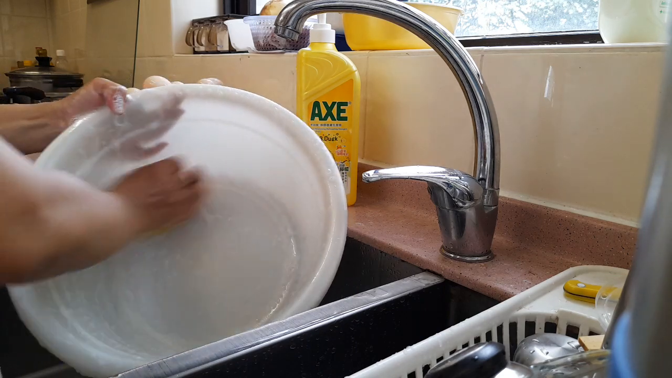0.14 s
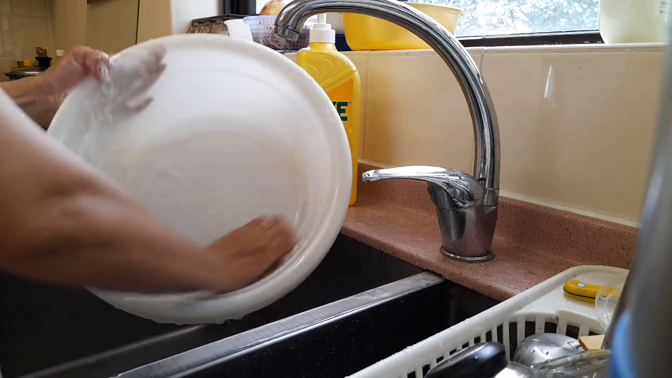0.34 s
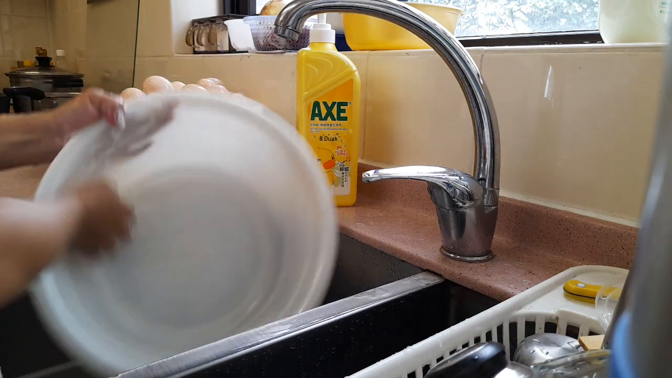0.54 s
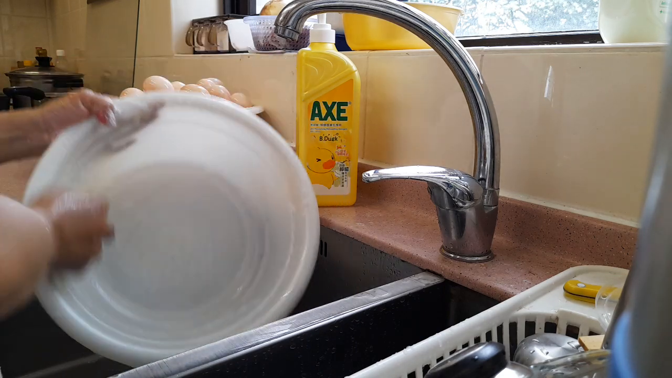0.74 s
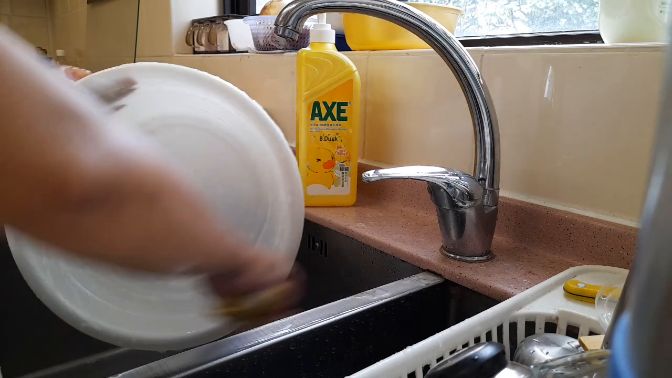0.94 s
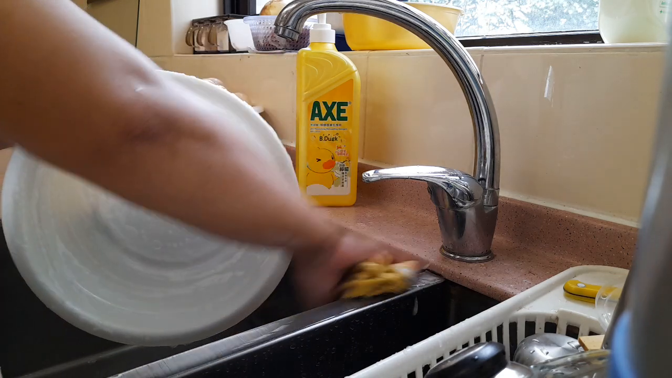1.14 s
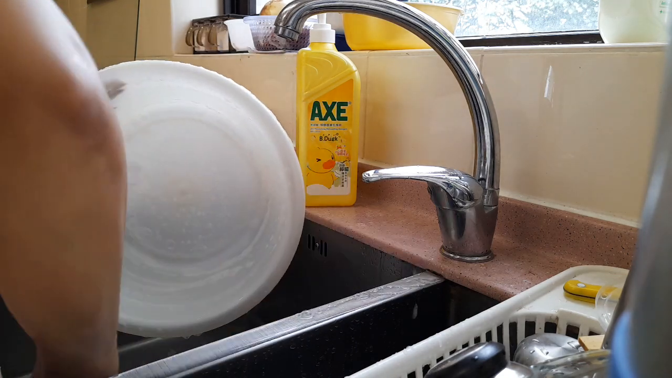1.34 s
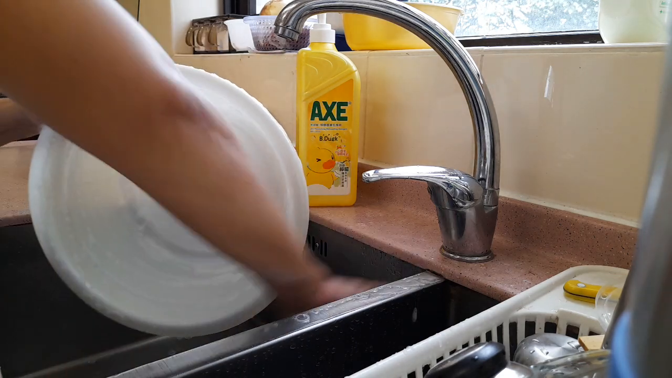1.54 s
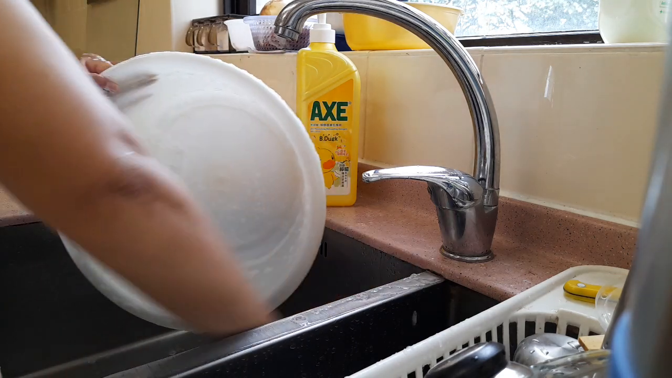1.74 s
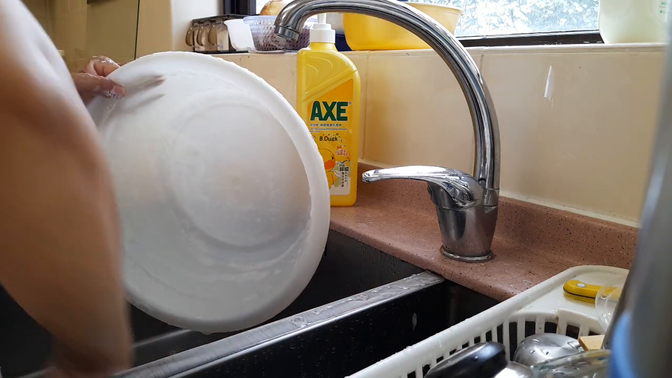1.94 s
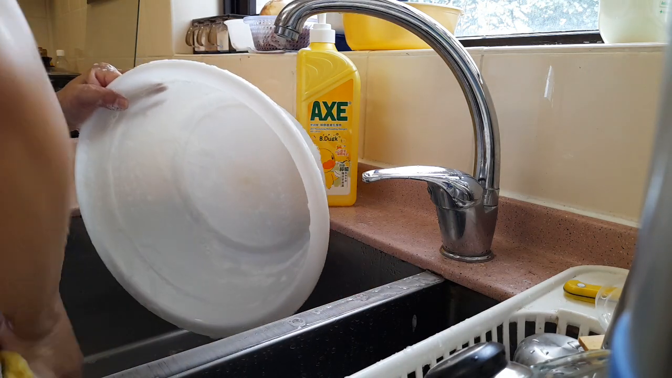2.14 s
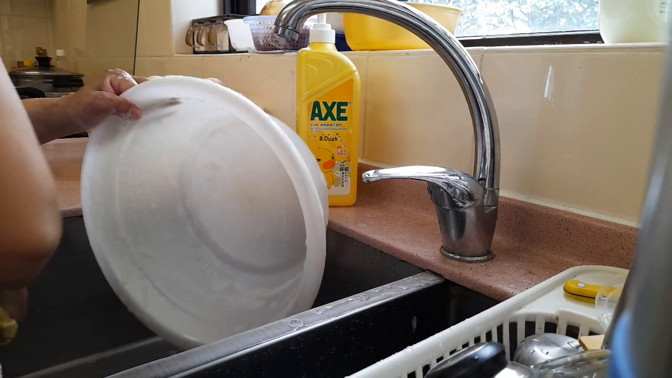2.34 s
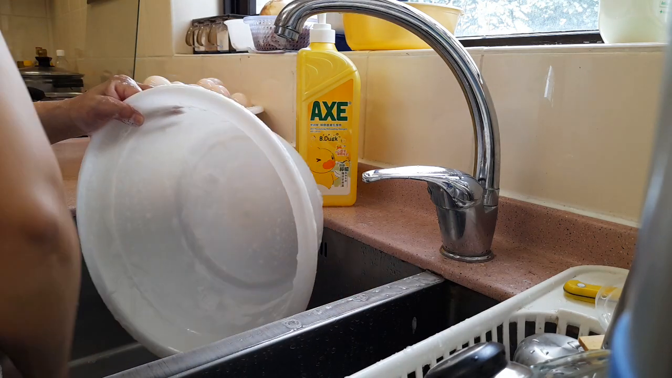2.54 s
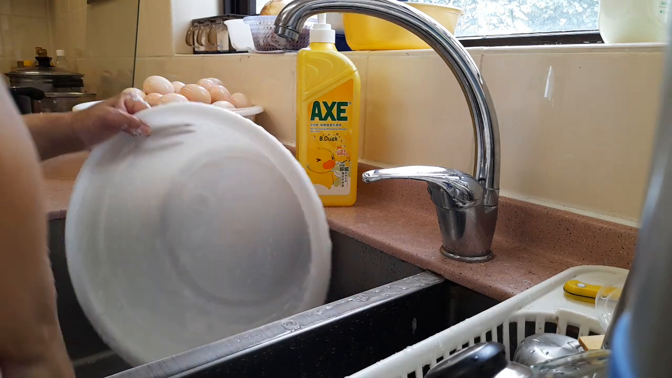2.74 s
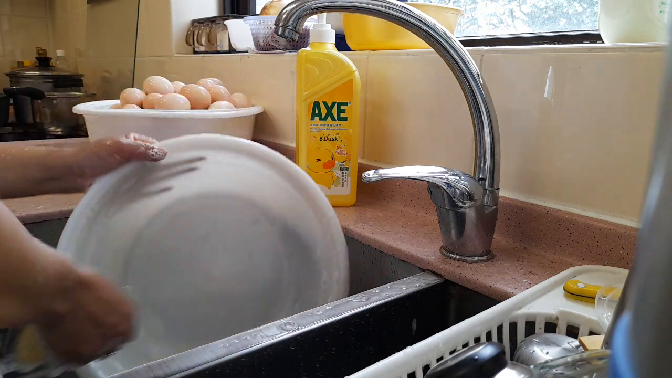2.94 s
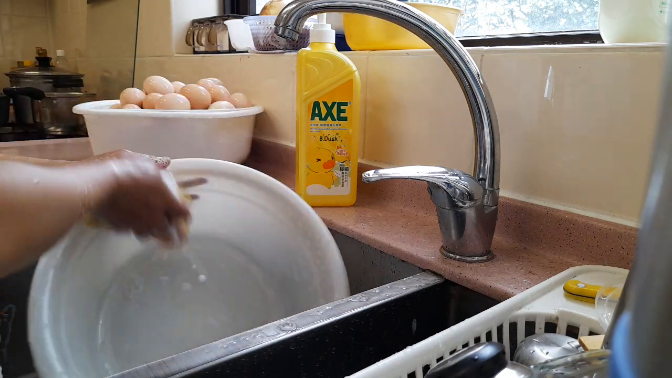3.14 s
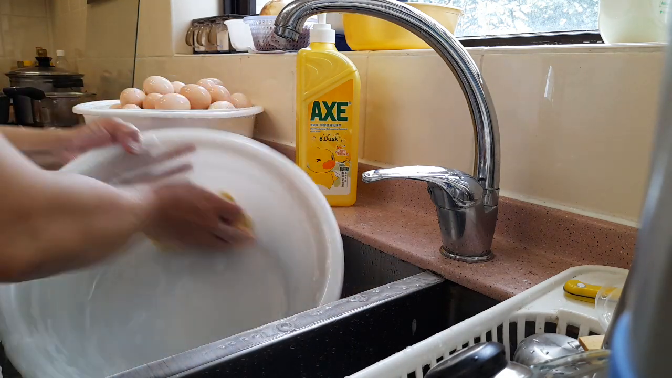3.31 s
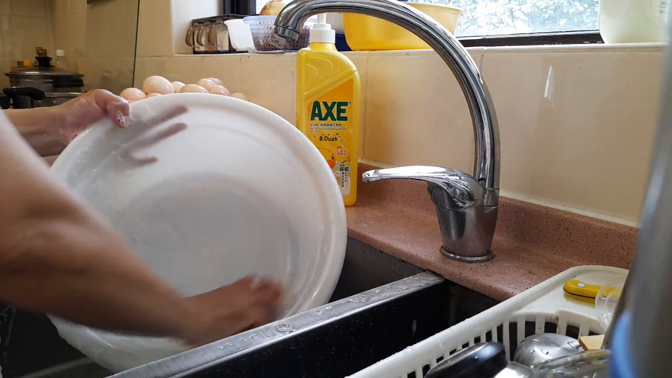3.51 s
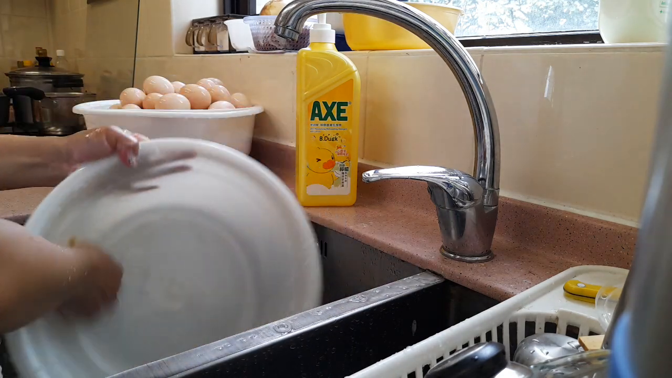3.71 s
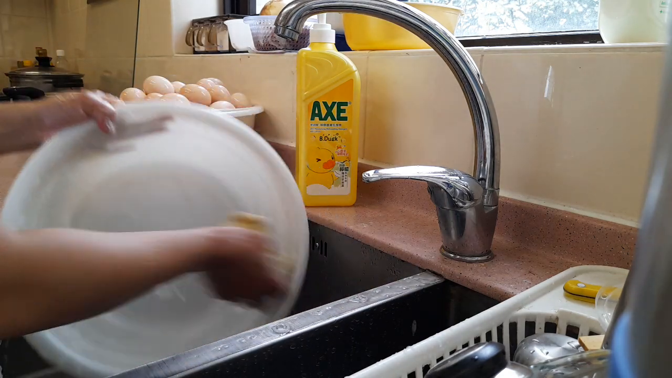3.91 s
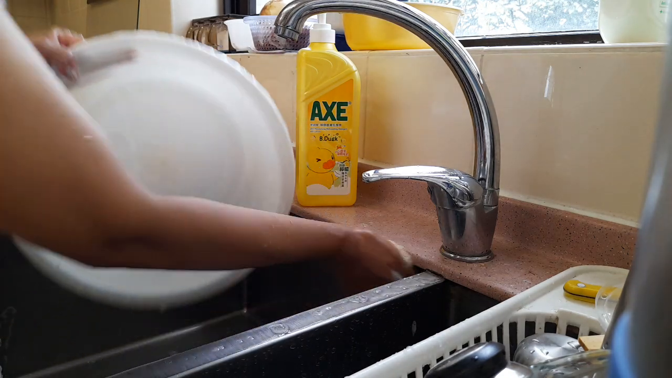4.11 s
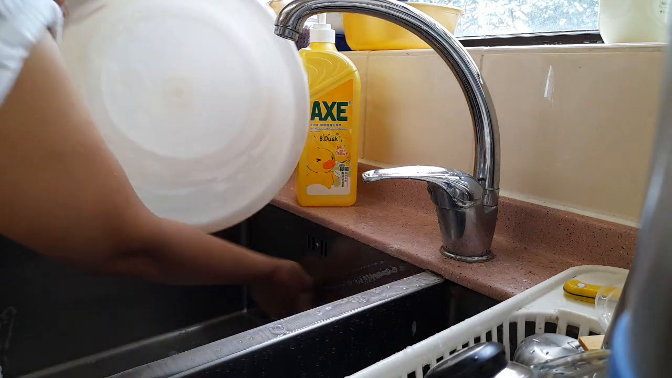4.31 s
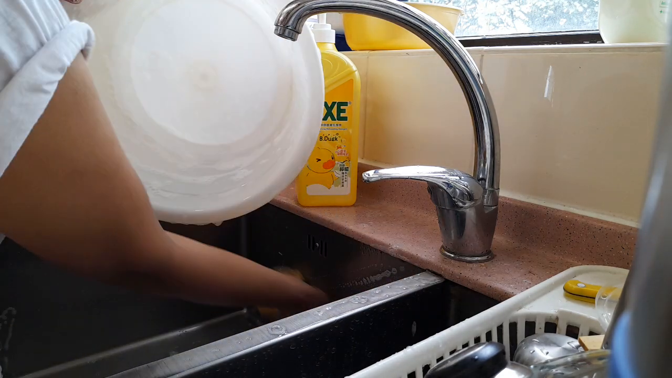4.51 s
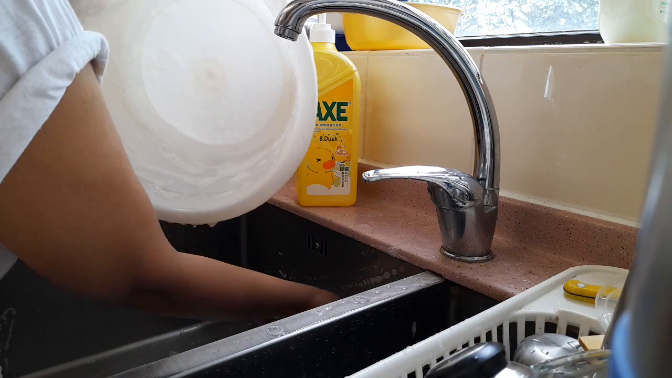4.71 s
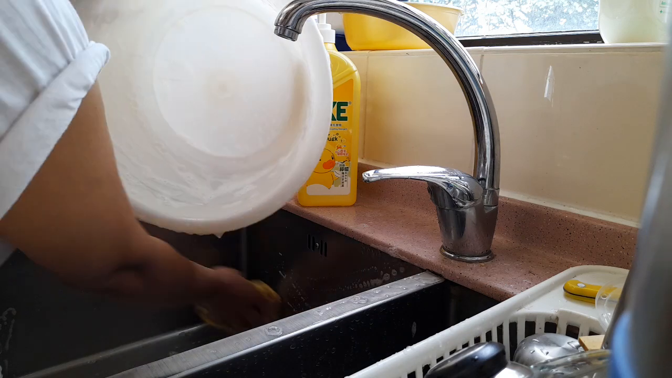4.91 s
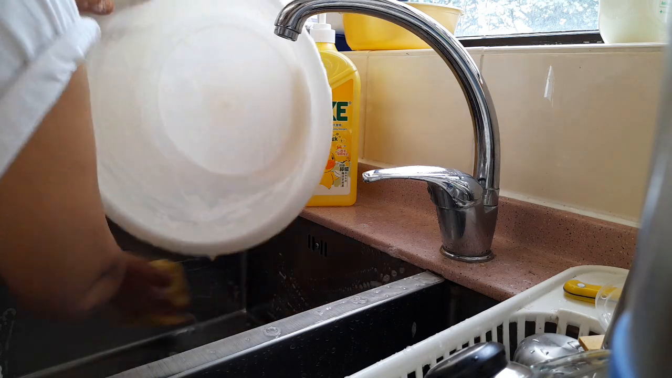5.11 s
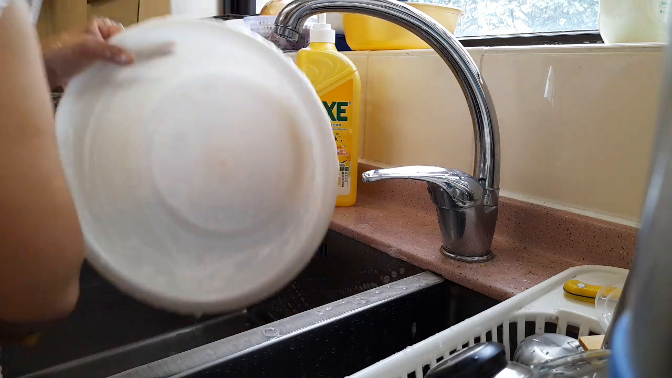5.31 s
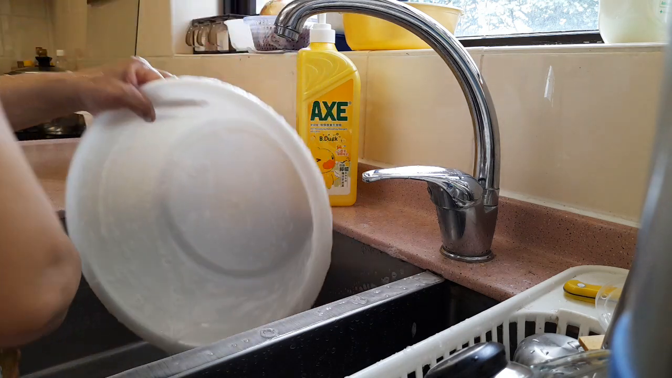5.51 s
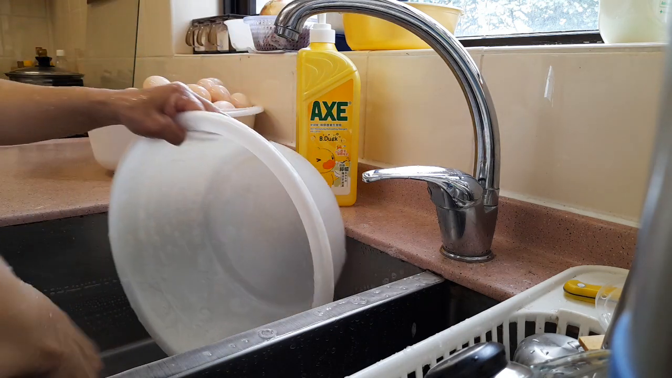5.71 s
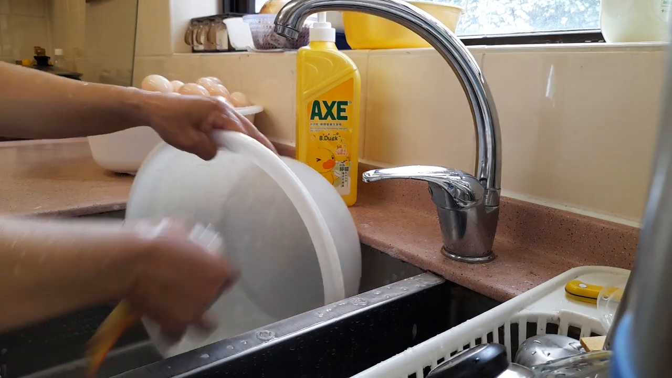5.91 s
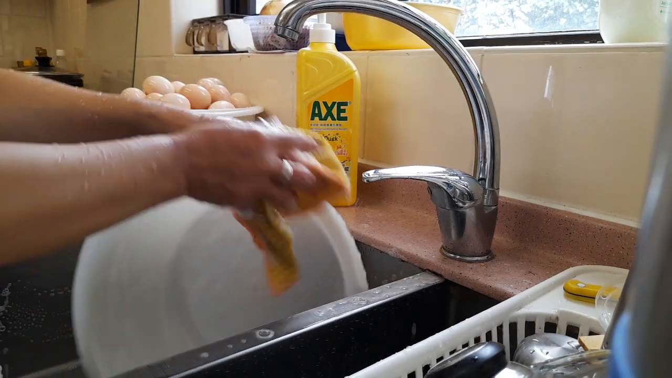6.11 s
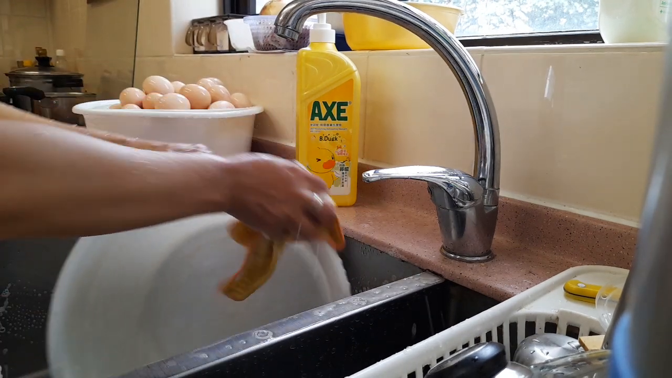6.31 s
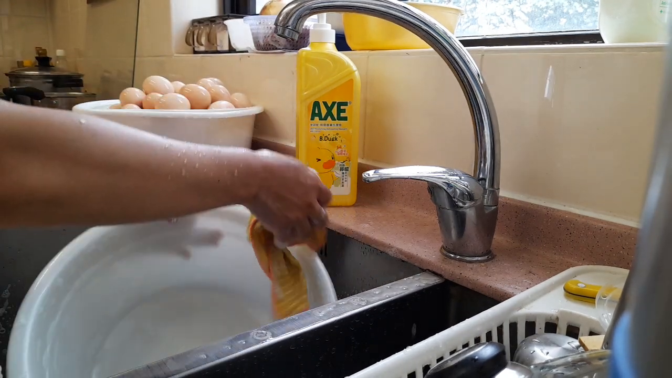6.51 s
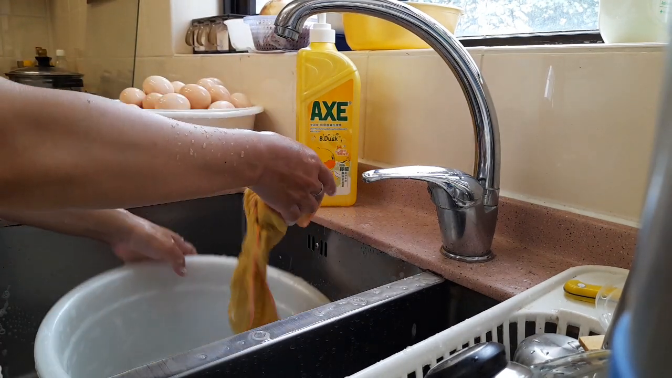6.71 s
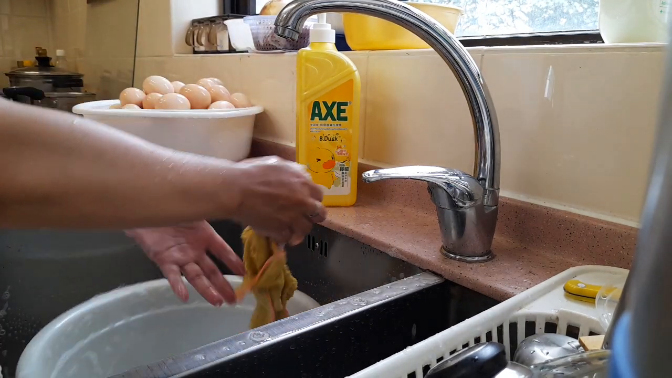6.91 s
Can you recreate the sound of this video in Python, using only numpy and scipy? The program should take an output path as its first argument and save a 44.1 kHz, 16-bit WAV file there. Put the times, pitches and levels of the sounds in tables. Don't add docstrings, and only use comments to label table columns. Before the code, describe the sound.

A wet sponge wipes a large plastic basin in a steel sink, heard close in a small tiled kitchen. Faint scuffs and a few dull booms come first, then a loud hollow knock, a quieter stretch of slaps and suds crackle, and finally a rapid cluster of hard thumps and rim clacks. Low outdoor rumble, fan murmur and a very faint high whine lie underneath.

```python
import sys
import numpy as np
from scipy import signal
from scipy.fft import rfft, irfft, next_fast_len
from scipy.io import wavfile
from scipy.ndimage import uniform_filter1d, map_coordinates

SR = 44100
rng = np.random.default_rng(int(sys.argv[2]) if len(sys.argv) > 2 else 0)


def wav_record(signal):
    frames = np.transpose(np.atleast_2d(signal))
    bounded = np.clip(frames, -1, 1)
    quanta = np.round(bounded * 32767).astype(np.int16)
    wavfile.write(sys.argv[1], SR, quanta)


def decibels_to_gain(level_db):
    exponent = np.asarray(level_db, float) / 20
    return 10 ** exponent


N = 306495
PAD, FRAME = 8192, 512

# time in [s], level in [dB].
RUMBLE_LEVEL = [
    (0.0, -54.5),
    (3.1, -52.5),
    (3.46, -45.5),
    (3.66, -51),
    (4.5, -52),
    (4.74, -52),
    (5.36, -52.5),
    (5.73, -50.5),
    (6.19, -53.5),
    (6.95, -45),
]
# frequency in [Hz], density in [dB per Hz].
RUMBLE_COLOUR = [(15, -48), (25, -28), (39, -8.5), (59, 4.5), (80, -6.5), (188, -4), (222, -6.5),
                 (259, -26), (295, -12), (387, -17.5), (420, -25), (550, -61), (920, -120)]
FAN_COLOUR = [(180, -13.5), (300, 1), (388, -6.5), (413, -11), (528, -2), (579, -7), (690, -2.5),
              (1040, -4.5), (1200, -12), (1500, -15.5), (2200, -28), (3500, -47), (4550, -58), (7700, -120)]
HISS_COLOUR = [(1200, -23), (2000, 4.5), (2460, -26), (5160, -12), (8550, -18), (9660, -29), (12700, -8),
               (13700, -3), (14300, -14), (14700, -34), (15200, -49), (16000, -60)]
SPONGE_COLOUR = [(300, -47), (600, 1), (1200, 4.5), (1830, -2), (3050, -6.5), (6800, -15.5), (8630, -15.5),
                 (9820, -10), (12700, -17.5), (14500, -14), (15600, -48), (16300, -70), (17000, -90)]
FAN_DB, FAN_FOLLOWS = -48.5, 0.53

# frequency in [Hz], level in [dB rms].
WHINE_TONE = [(13297, -68.5)]
# time in [s], gain in [dB].
WHINE_GAIN = [
    (0, -3),
    (3, -4.5),
    (4, -1.5),
    (6.95, -0.5),
]

# time in [s], hiss in [dB].
STROKE_LEVEL = [(0.0, -58.5), (0.29, -56), (0.41, -58.5), (1.08, -60.5), (1.59, -57.5), (1.74, -59.5),
                (2.9, -59.5), (3.31, -55.5), (3.39, -46.5), (3.6, -55), (4.04, -61), (4.18, -57),
                (4.63, -61.5), (6.08, -55), (6.21, -49), (6.58, -60.5), (6.7, -50.5), (6.95, -58)]
# strongest moment in [s], rumble in [dB], time to fade 10 dB either side in [s].
RIM_DRAGS = [(0.29, -38, 0.5), (1.17, -37, 0.5), (2.2, -40.5, 1.3), (3.39, -24, 0.07), (3.56, -41, -37),
             (4.15, -40, 1.5), (5.2, -38.5, 0.5), (5.71, -42, 0.9), (6.21, -35, 0.9), (6.58, -18.5, 0.05),
             (6.72, -30.5, 0.5), (6.95, -17, 0)]
RESTING_DB = -47

# frequency in [Hz], level in [dB], t60 in [s].
SINK_MODES = [(113, 12.5, 0.31), (139.6, 15, 1), (178, 18, 1), (181, 4, 1), (216, 5, 0.13),
              (285, -1.5, 0.65), (326, -7, 0.71), (364, 0, 0.058), (462, -4, 0.62), (539, -7.5, 0.11),
              (620, -24, 0.059), (670, -3.5, 0.46)]
# start in [s], steel boom in [dB], basin boom in [dB], basin pitch in [Hz].
SINK_BLOWS = [(0.181, -51, -58, 176), (1.316, -35, -23.5, 178), (1.417, -40, -24, 179),
              (1.645, -28, -21, 197.6), (1.7, -43, -50, 205), (1.749, -40, -30.5, 170),
              (2.062, -50, -31.5, 196), (2.409, -52, -33.5, 192), (3.313, -14.5, -12, 195),
              (3.363, -22.5, -60, 200), (3.992, -35, -57, 200), (4.109, -20, -55, 210),
              (5.02, -32, -46, 188), (5.565, -35.5, -38, 200), (5.717, -34, -31, 188),
              (6.144, -17.5, -26, 200), (6.191, -19.5, -46, 204), (6.208, -50, -50, 200),
              (6.226, -29, -17, 202), (6.264, -17.5, -34, 197), (6.299, -26.5, -35, 195),
              (6.33, -50, -47, 200), (6.512, -13.5, -12, 200), (6.559, -5, -5.5, 181),
              (6.621, -42, -40, 190), (6.643, -31, -16.5, 188), (6.669, -42, -32, 180),
              (6.787, -24, -52, 200), (6.858, -16, -17.5, 185), (6.909, -35, -17, 206)]
# time in [s], t60 in [s].
STEEL_DECAY = [
    (3.33, 0.58),
    (3.36, 0.85),
    (3.9, 0.39),
    (4.1, 0.48),
    (4.5, 0.26),
    (6.52, 0.34),
    (6.55, 0.24),
    (6.63, 0.32),
]
# start in [s], low tone in [dB], [Hz], high tone in [dB], [Hz].
WALL_TONES = [(0.169, -53, 362, -38, 449), (1.315, -23.5, 333.4, -28, 549), (1.654, -29, 288, -49, 500),
              (1.682, -32, 284, -64, 490), (2.4, -48, 312, -38, 670), (3.312, -27, 335.5, -31.5, 652),
              (3.364, -33, 269, -30.5, 489), (4.11, -52, 272, -73, 560), (5.72, -26.5, 248.5, -30, 559),
              (6.14, -36, 267, -32, 678), (6.189, -42, 280, -32.5, 672), (6.21, -33, 377, -40, 670),
              (6.264, -32.5, 369, -51, 420), (6.516, -40, 400, -24, 670), (6.558, -23, 340, -33, 497),
              (6.578, -22.5, 285, -37, 543), (6.64, -47, 258, -38, 496), (6.786, -40, 280, -40, 670),
              (6.859, -28.5, 482, -25.5, 670), (6.89, -33, 315, -31, 620), (6.912, -30, 475, -32, 624)]
# start in [s], peak in [dB], frequency in [Hz].
BOWL_AIR = [(1.316, -22, 112.4), (1.739, -35, 109), (1.875, -37, 120), (3.313, -22, 107), (3.364, -27, 140),
            (3.498, -29, 122), (4.109, -40.5, 118.6), (5.723, -30, 111), (6.13, -34, 107),
            (6.223, -28, 132), (6.265, -31, 108), (6.298, -25, 136), (6.384, -28, 132.4),
            (6.512, -17.5, 119.3), (6.556, -23, 113), (6.641, -23, 115), (6.859, -25, 123),
            (6.907, -24, 155)]
# start in [s], peak in [dB], frequency in [Hz].
COUNTER_SHAKES = [(1.055, -43, 66), (1.36, -39, 58), (1.744, -38, 83), (3.313, -20, 79.3),
                  (3.369, -21, 77.5), (4.718, -36, 55), (6.145, -23.5, 76), (6.227, -25.5, 88.6),
                  (6.265, -21.5, 91.6), (6.382, -38, 89), (6.511, -20, 89), (6.557, -38, 89)]
# start in [s], peak in [dB], frequency in [Hz].
BASIN_PUSHES = [
    (1.3143, -19, 332),
    (1.317, -25, 225),
    (1.6445, -39, 253),
    (3.3139, -19, 180),
    (5.7224, -20, 252),
    (6.1408, -21.5, 238),
    (6.5142, -20, 200),
    (6.86, -24, 200),
    (6.868, -21, 160),
]
STEEL_HZ = 215.9
BASIN_T60, WALL_T60, BOWL_T60, COUNTER_T60, PUSH_T60 = 0.12, 0.17, 0.24, 0.31, 0.022
CHOKE_T60 = 0.067

# start in [s], peak in [dB], frequency in [Hz].
BUBBLES = [(0.1765, -48, 14300), (0.1768, -48, 10600), (0.3044, -45, 9950), (0.3461, -45, 11800),
           (0.411, -46, 12100), (1.064, -54, 9550), (1.119, -51, 9600), (1.4077, -47, 11500),
           (2.5566, -50, 12500), (2.564, -54, 14500), (3.2435, -44, 14300), (3.2437, -46, 10500),
           (3.473, -45, 11400), (3.497, -45, 9420), (3.508, -46, 9300), (3.5085, -48, 12200),
           (4.5935, -56, 9900), (4.66, -54, 10500), (5.015, -52, 11200), (5.0152, -50, 14300),
           (5.0357, -31, 10200), (5.3383, -42, 10300)]
SUDS_WIDTH, SUDS_T60 = 0.13, 0.022

# frequency in [Hz], width in [Hz], level in [dB].
SHELL_MODES = [(800, 510, -5), (1043, 57, 5), (970, 170, 20), (1190, 67, -12), (1430, 130, 11),
               (1630, 140, 9.5), (1710, 130, 14), (1950, 55, -25), (2410, 61, 7), (2750, 550, 4)]
# start in [s], scuff in [dB], shell knock in [dB], fizz in [dB], t60 in [s].
RIM_KNOCKS = [(0.1767, -47, -45, -50.5, 0.34), (0.3042, -43, -43, -48, 0.08),
              (0.3464, -52, -44.5, -51, 0.2), (0.4144, -58, -52, -54, 0.063), (1.3153, -45, -34, -52, 0.04),
              (3.3112, -26, -26, -31.5, 0.13), (3.3695, -34.5, -37.5, -47, 0.12),
              (3.5024, -39.5, -42.5, -46, 0.12), (4.1103, -41.5, -41.5, -51, 0.12),
              (5.7184, -48, -44, -62, 0.09), (6.1392, -28.5, -29, -42, 0.074),
              (6.1911, -28.5, -28, -37.5, 0.045), (6.198, -32.5, -34, -46, 0.056),
              (6.2365, -43, -37, -59, 0.15), (6.2737, -34, -33.5, -51, 0.067),
              (6.5111, -22.5, -22.5, -29, 0.06), (6.53, -36, -33, -40, 0.043),
              (6.559, -30, -29.5, -49, 0.04), (6.568, -41, -34, -53, 0.045),
              (6.639, -37.5, -35.5, -48, 0.043), (6.7824, -40, -40, -54, 0.047),
              (6.8568, -24.5, -26.5, -31, 0.051), (6.878, -41, -40, -51, 0.061),
              (6.905, -52, -44, -55, 0.068)]
# start in [s], scuff in [dB], shell knock in [dB], fizz in [dB].
SPONGE_SLAPS = [(0.2131, -46, -52, -54), (0.24, -51, -56, -56), (0.268, -53, -53, -57),
                (0.378, -51, -53, -61), (0.601, -49.5, -49, -51), (0.6392, -60, -53, -68),
                (0.7496, -57, -51, -59), (1.067, -52, -66, -58), (1.108, -53, -52, -54),
                (1.118, -35, -43, -45), (1.405, -39.5, -45, -45.5), (1.6378, -42, -47, -44),
                (2.059, -50.5, -56, -58), (2.1277, -45, -45, -64), (2.398, -46, -44, -55),
                (2.4042, -33.5, -57, -40.5), (2.5553, -50.5, -64, -47.5), (2.9294, -51, -52, -94),
                (3.206, -46, -46, -50), (3.219, -36, -42, -38.5), (3.78, -45.5, -43.5, -72),
                (3.9846, -39, -47, -45), (3.991, -44, -43.5, -47), (4.594, -48.5, -52.5, -58),
                (4.662, -52, -63, -61), (5.015, -47, -44.5, -49), (5.0357, -40, -41.5, -38),
                (5.3376, -38.5, -65, -45), (5.773, -39.5, -50.5, -59), (5.925, -47.5, -60, -57),
                (6.7493, -46, -70, -50), (6.823, -42, -41, -76)]
KNOCK_RISE_S, KNOCK_SOFTER = 0.00051, 0.46
SLAP_T60, SLAP_RISE_S, SLAP_SOFTER = 0.098, 0.0014, 0.24

# start in [s], lower tone in [dB], [Hz], upper tone in [dB], [Hz].
SHELL_CLACKS = [
    (1.3155, -29, 1000, -35, 1390),
    (3.312, -28.5, 906, -30, 1793),
    (5.7208, -35.5, 1430, -40, 1830),
    (6.1398, -28, 970, -29.5, 1570),
    (6.1927, -35, 1035, -34, 1580),
    (6.2747, -50, 956, -38, 1590),
    (6.5114, -24, 1426, -29, 1730),
    (6.558, -32, 1396, -42, 1780),
    (6.638, -38, 906, -49, 1530),
    (6.857, -29, 1160, -34, 1390),
]
# start in [s], peak in [dB], frequency in [Hz].
RIM_TONES = [(1.1195, -37, 1990), (1.1215, -47, 2370), (1.317, -37, 1975), (3.3125, -30, 1630),
             (3.313, -34, 2200), (6.858, -25, 884), (1.639, -43, 1400), (3.3125, -25, 1400),
             (6.141, -30, 2510), (6.146, -40, 1700), (6.193, -31, 2520), (6.198, -44, 1330),
             (6.237, -37, 1600), (6.276, -41, 2510), (6.2765, -35, 1650), (6.5123, -28, 940),
             (6.56, -36, 2445), (6.561, -24, 1630), (6.783, -34, 990), (6.858, -25, 754),
             (6.896, -36, 1390)]
CLACK_TURN, CLACK_T60 = 1.3, 0.12

# frequency in [Hz], t60 in [s].
KITCHEN_DECAY = [(100, 0.55), (500, 0.29), (2000, 0.32), (6000, 0.37), (13000, 0.33)]
WALL_GAP, SCATTER_HZ = 130, 328
# frequency in [Hz], likeness from [-1 to 1].
PORT_LIKENESS = [(90, .98), (190, .93), (420, .48), (700, .42), (1150, 0), (1650, -.42), (2600, .25),
                 (3300, 0)]
# frequency in [Hz], left minus right in [dB].
PORT_TILT = [(60, -4.5), (130, -2.5), (290, -2.5), (640, 0), (1410, -5.5), (3100, -1), (6820, -3.5),
             (15000, 7)]
RIGHT_LAG = 0.00012


def unit(x):
    return x / np.sqrt(np.mean(x ** 2) + 1e-20)


def along(points, hz):
    f, v = np.transpose(points)
    return np.interp(np.log(hz + 1), np.log(f + 1), v)


def curves(rows):
    s, *cols = np.transpose(rows)
    return [np.interp(np.arange(N) / SR, s, c) for c in cols]


def wobble(rate, size=N):
    knots = np.random.default_rng(rng.integers(1e9)).standard_normal(int(size * rate / SR) + 4)
    return map_coordinates(knots, [np.arange(size) * rate / SR])


def filtered(x, response):
    m = next_fast_len(x.shape[-1] + PAD)
    return irfft(rfft(x, m) * response(np.fft.rfftfreq(m, 1 / SR)), m)[..., :x.shape[-1]]


def resonances(peaks):
    def response(f):
        return sum((-1) ** k * decibels_to_gain(db) * 1j * f * width / (hz * hz - f * f + 1j * f * width)
                   for k, (hz, width, db) in enumerate(peaks))
    return response


def place(out, s, sound):
    start = round(s * SR)
    out[..., start:start + sound.shape[-1]] += sound


def rush(colour, patchy_db):
    z = signal.stft(rng.standard_normal((2, N)), nperseg=FRAME)[2]
    field = uniform_filter1d(rng.standard_normal(z.shape[1:]), size=6, axis=0)
    field = uniform_filter1d(field, size=12, axis=1)
    pair = signal.istft(z * decibels_to_gain(patchy_db * unit(field)), nperseg=FRAME)[1][:, :N]
    return unit(filtered(pair, lambda hz: decibels_to_gain(along(colour, hz))))


def kitchen_air():
    rumble_db, = curves(RUMBLE_LEVEL)
    fan_db = FAN_DB + FAN_FOLLOWS * (rumble_db - rumble_db.mean())
    rumble = decibels_to_gain(rumble_db + 6.0 + wobble(3.22)) * rush(RUMBLE_COLOUR, patchy_db=0.77)
    fan = decibels_to_gain(fan_db + 0.1 + 0.6 * wobble(5)) * rush(FAN_COLOUR, patchy_db=0.6)
    hiss = decibels_to_gain(-66) * rush(HISS_COLOUR, patchy_db=1.0)
    return rumble + fan + hiss


def whine():
    t = np.arange(N) / SR
    (hz, db), = WHINE_TONE
    drift_db, = curves(WHINE_GAIN)
    flutter_db, waver = 1.8 * wobble(7), 0.7 * wobble(20)
    tone = decibels_to_gain(db + 13.0 + drift_db + flutter_db) * np.sin(2 * np.pi * hz * t + waver)
    smear = decibels_to_gain(-76.5 + 2 * wobble(3)) * np.sin(2 * np.pi * 5500 * t + 1.2 * wobble(150))
    smear += decibels_to_gain(-84 + 2.5 * wobble(2)) * np.sin(2 * np.pi * 7750 * t + 1.5 * wobble(200))
    return decibels_to_gain([[1.1], [-1.1]]) * (tone + smear)


def strokes():
    t = np.arange(N) / SR
    hiss_db, = curves(STROKE_LEVEL)
    hiss = decibels_to_gain(hiss_db + 0.8 * wobble(12) + 0.5 * wobble(300)) * rush(SPONGE_COLOUR, patchy_db=1.0)
    swells = [db - 10 * np.abs(t - s) / max(fade, 0.01) for s, db, fade in RIM_DRAGS]
    drag_db = np.max(swells, axis=0).clip(RESTING_DB)
    steel = resonances([(hz, 6 / t60, db) for hz, db, t60 in SINK_MODES])
    friction = decibels_to_gain(3 * wobble(40)) * rng.standard_normal((2, N))
    return hiss + decibels_to_gain(drag_db - 9.0) * unit(filtered(friction, steel))


def chokes(rows, t):
    gaps = np.diff([row[0] for row in rows], append=N / SR)[:, None]
    return decibels_to_gain(-60 * (t - gaps).clip(0) / CHOKE_T60)


def thumps():
    out, t = np.zeros(N + SR), np.arange(SR // 2) / SR
    dull = resonances([(414, 220, 0)])

    def ring(db, hz, t60):
        return decibels_to_gain(db - 60 * t / t60) * np.sin(2 * np.pi * hz * t) * (1 - np.exp(-t / 0.002))

    def apart(hz, *wall_hz):
        return hz > 250 and np.abs(np.log(hz / np.array(wall_hz))).min() > 0.08

    for (s, steel_db, basin_db, basin_hz), choke in zip(SINK_BLOWS, chokes(SINK_BLOWS, t)):
        steel = ring(steel_db - 1.5, STEEL_HZ, np.interp(s, *np.transpose(STEEL_DECAY)))
        basin = ring(basin_db + 1.0, basin_hz, BASIN_T60)
        place(out, s, choke * (steel - basin))
    for (s, low_db, low_hz, high_db, high_hz), choke in zip(WALL_TONES, chokes(WALL_TONES, t)):
        tones = ring(low_db, low_hz, WALL_T60) - ring(high_db + 0.5, high_hz, 0.72 * WALL_T60)
        rest = sum(ring(high_db - 10 + db + rng.normal(0, 1.2), hz, t60)
                   for hz, db, t60 in SINK_MODES if apart(hz, low_hz, high_hz))
        puff = decibels_to_gain(high_db - 6 - 60 * t / 0.09) * unit(filtered(rng.standard_normal(len(t)), dull))
        place(out, s, choke * (tones + rest + puff))
    for rows, t60 in [(BOWL_AIR, BOWL_T60), (COUNTER_SHAKES, COUNTER_T60), (BASIN_PUSHES, PUSH_T60)]:
        for s, db, hz in rows:
            place(out, s, ring(db + 2.0, hz, t60))
    return out[:N]


def suds():
    out, t = np.zeros((2, N + SR)), np.arange(SR // 20) / SR
    for s, db, hz in BUBBLES:
        bubble = resonances([(hz, SUDS_WIDTH * hz, 0)])
        pop = unit(filtered(rng.standard_normal((2, len(t))), bubble))
        place(out, s, decibels_to_gain(db - 1.0 - 60 * t / SUDS_T60) * pop)
    return out[:, :N]


def contacts():
    out, t = np.zeros((2, N + SR)), np.arange(SR // 2) / SR
    body = resonances([(886, 1700, 2.1)])

    def scuff(hz):
        return decibels_to_gain(along(SPONGE_COLOUR, hz)) / (1 + (hz / 7000) ** 6) / (1 + (3600 / (hz + 1)) ** 3)

    def fizz(hz):
        return decibels_to_gain(along(SPONGE_COLOUR, hz)) / (1 + (7000 / (hz + 1)) ** 6)

    touches = [(*row, KNOCK_RISE_S * decibels_to_gain(-KNOCK_SOFTER * (row[1] + 26))) for row in RIM_KNOCKS]
    for row in SPONGE_SLAPS:
        spread = decibels_to_gain(-SLAP_SOFTER * (max(row[1:]) + 38))
        touches.append((*row, SLAP_T60 * spread, SLAP_RISE_S * np.sqrt(spread)))
    for s, scuff_db, knock_db, fizz_db, t60, rise in touches:
        bend = np.exp(rng.normal(0, 0.03))
        modes = resonances([(hz * bend, 2 * width, db + rng.normal(0, 2.5)) for hz, width, db in SHELL_MODES])
        shell = lambda hz: (0.34 * modes(hz) + body(hz)) / (1 + 1j * hz / 1400 - (hz / 1900) ** 2)
        crack = 1 + 0.34 * decibels_to_gain(-60 * t / (25 * rise))
        shape = crack * decibels_to_gain(-60 * t / t60) * (1 - np.exp(-t / rise))
        grit = decibels_to_gain(0.96 * wobble(470, size=len(t))) * rng.standard_normal((3, 2, len(t)))
        knock, rub, wet = [unit(filtered(g, colour)) for g, colour in zip(grit, (shell, scuff, fizz))]
        burst = decibels_to_gain(knock_db - 0.5) * knock + decibels_to_gain(scuff_db - 7.0) * rub + decibels_to_gain(fizz_db - 3.5) * wet
        place(out, s, shape / shape.max() * burst)
    return out[:, :N]


def clacks():
    out, t = np.zeros((2, N + SR)), np.arange(SR // 4) / SR
    turn = np.array([[0], [CLACK_TURN]])

    def ring(db, hz):
        return decibels_to_gain(db - 60 * t / CLACK_T60) * np.sin(2 * np.pi * hz * t + turn)

    for s, low_db, low_hz, high_db, high_hz in SHELL_CLACKS:
        tones = ring(low_db, low_hz) - ring(high_db, high_hz)
        place(out, s, tones * (1 - np.exp(-t / 0.00028)))
    for s, db, hz in RIM_TONES:
        place(out, s, ring(db, hz) * decibels_to_gain(-60 * t / 0.081) * (1 - np.exp(-t / 0.00072)))
    return out[:, :N]


def kitchen(x):
    out, step = np.zeros((2, N + SR)), SR // 3
    for start in range(0, N, step):
        hz, t, z = signal.stft(rng.standard_normal((2, SR // 2)), SR, nperseg=FRAME // 2)
        decay = decibels_to_gain(-60 * t / along(KITCHEN_DECAY, hz)[:, None])
        tail = signal.istft(z * decay, SR, nperseg=FRAME // 2)[1]
        wet = signal.fftconvolve(x[None, start:start + step], tail / np.linalg.norm(tail[0]), axes=1)
        out[:, start + WALL_GAP:][:, :wet.shape[1]] += wet
    return out[:, :N]


def ports(pair):
    def mid_side(hz):
        turn = np.arccos(np.clip(along(PORT_LIKENESS, hz), -1, 1)) / 2
        return np.array([np.cos(turn), np.sin(turn)])
    mid, side = np.sqrt(2) * filtered(pair, mid_side)
    return np.array([mid + side, mid - side])


def spaced(pair, lag):
    def left_right(hz):
        half = decibels_to_gain(along(PORT_TILT, hz) / 2) * np.exp(1j * np.pi * hz * lag)
        return np.array([half, 1 / half])
    return filtered(pair, left_right)


def scene():
    air, electric, wiping = kitchen_air(), whine(), strokes()
    booms, bubbles, noisy, tones = thumps(), suds(), contacts(), clacks()
    taps, spread = noisy + tones
    high_pass = signal.butter(N=4, Wn=290, btype="high", fs=SR, output="sos")
    wall = signal.sosfilt(high_pass, booms)
    spread = 0.77 * spread + decibels_to_gain(-3.5) * wall
    direct = booms + taps + np.array([spread, -spread])
    scattered = filtered(booms, lambda hz: (1j * hz / (SCATTER_HZ + 1j * hz)) ** 2)
    to_room = decibels_to_gain(-3.0) * noisy[0] + decibels_to_gain(-6.5) * tones[0] + decibels_to_gain(-12) * booms + decibels_to_gain(-2.0) * scattered
    diffuse = ports(kitchen(to_room) + wiping + air)
    return spaced(direct, RIGHT_LAG) + spaced(diffuse, 0) + electric + bubbles


def band_limit(x):
    return signal.sosfilt(signal.butter(12, 15900, fs=SR, output="sos"), x)


def record(dry):
    high_pass = signal.butter(N=4, Wn=44, btype="high", fs=SR, output="sos")
    bass_cut = signal.sosfilt(high_pass, dry)
    mix = filtered(bass_cut, lambda hz: 1 / (1 + (hz / 15850) ** 40))
    return band_limit(mix)


dry = scene()
out = record(dry)
wav_record(out)
```